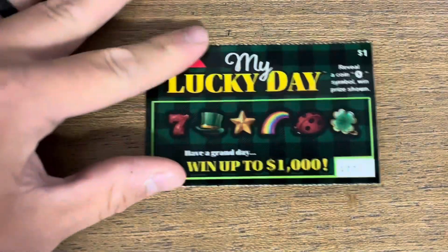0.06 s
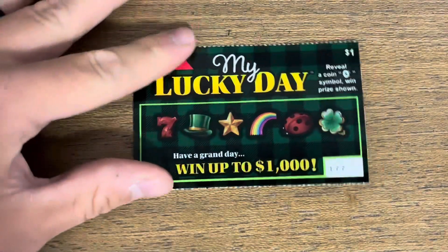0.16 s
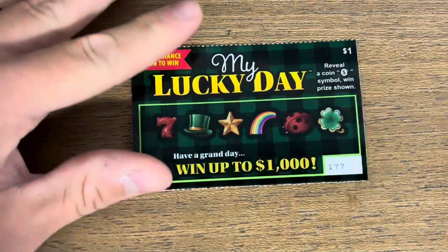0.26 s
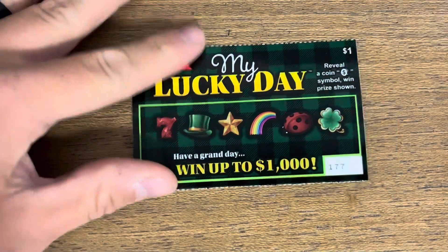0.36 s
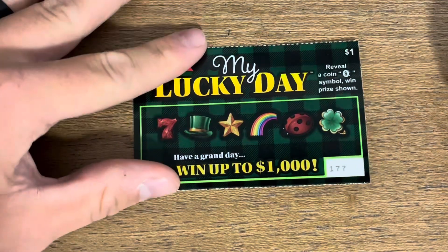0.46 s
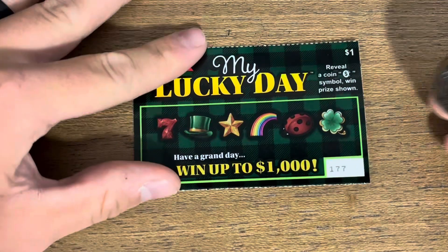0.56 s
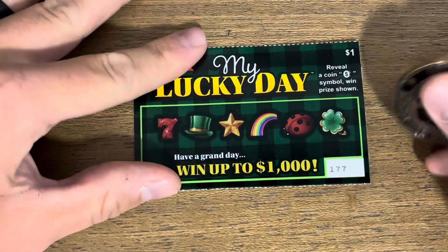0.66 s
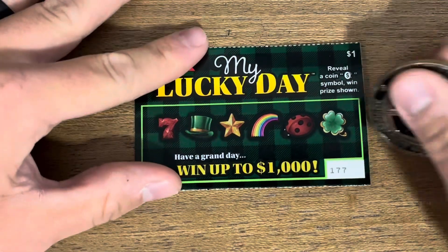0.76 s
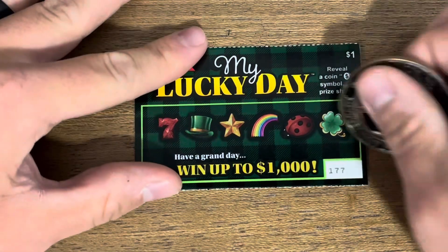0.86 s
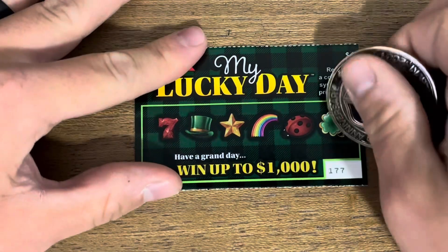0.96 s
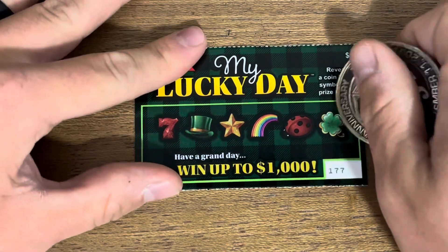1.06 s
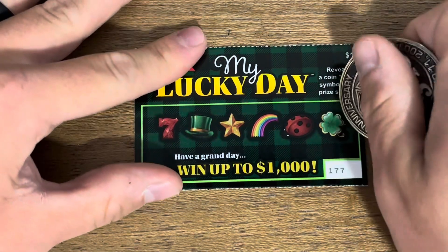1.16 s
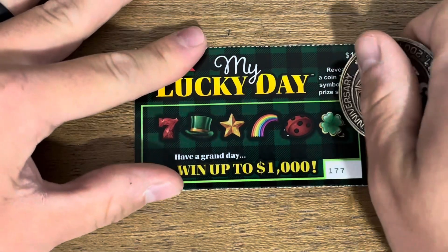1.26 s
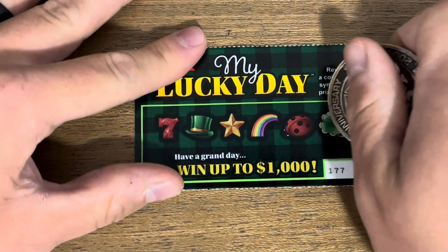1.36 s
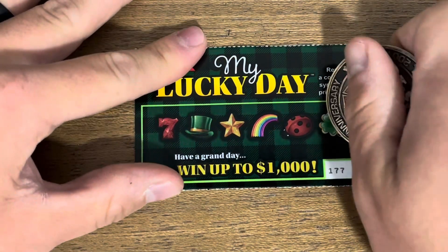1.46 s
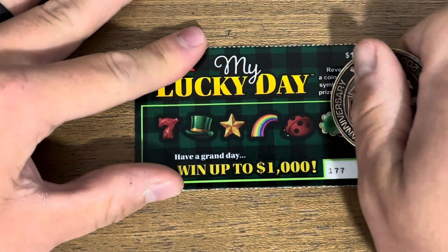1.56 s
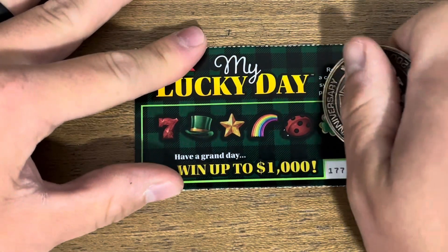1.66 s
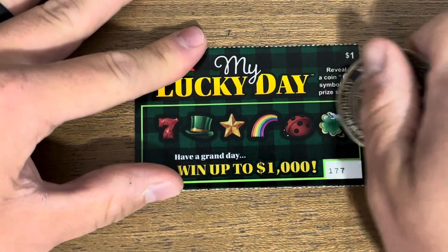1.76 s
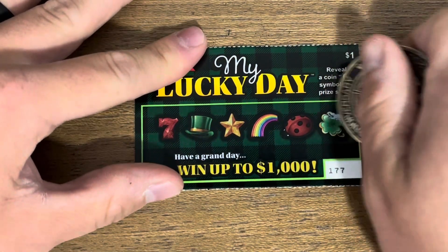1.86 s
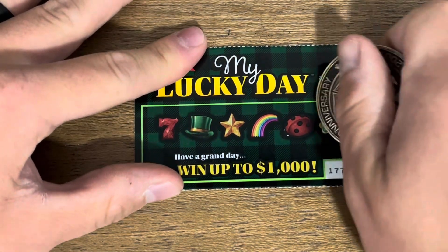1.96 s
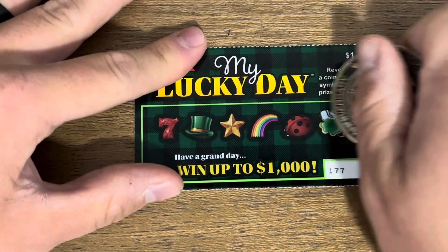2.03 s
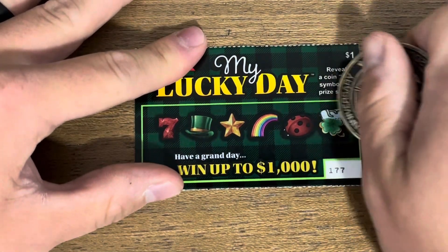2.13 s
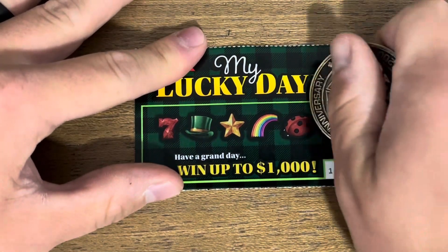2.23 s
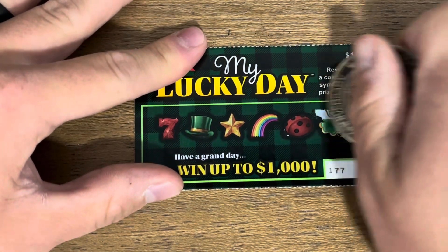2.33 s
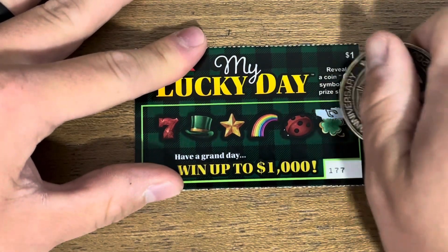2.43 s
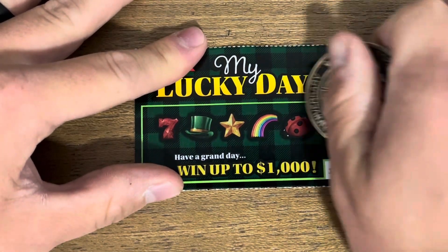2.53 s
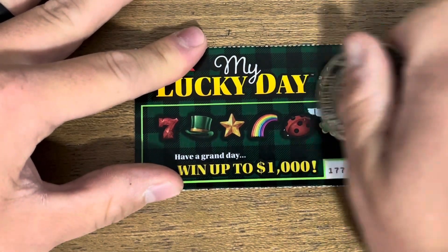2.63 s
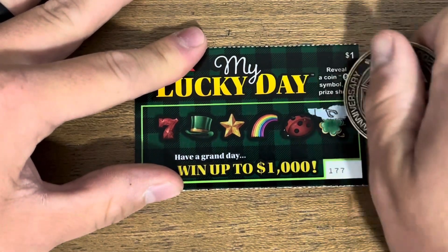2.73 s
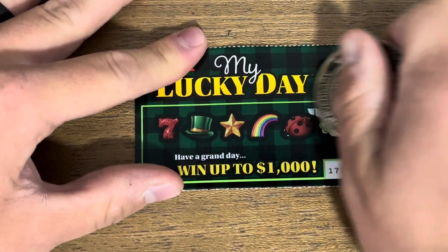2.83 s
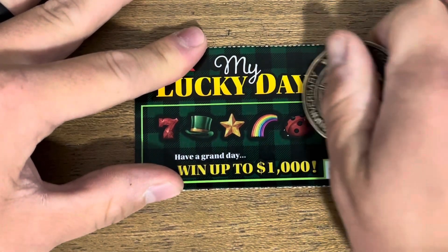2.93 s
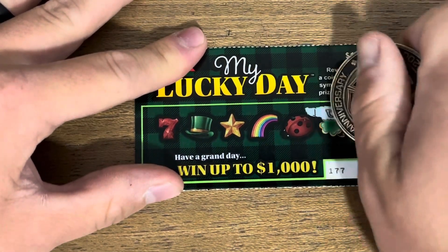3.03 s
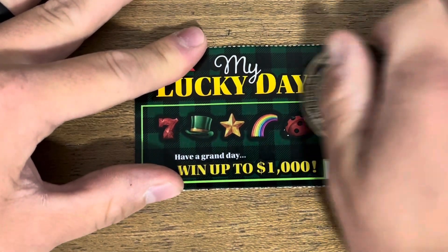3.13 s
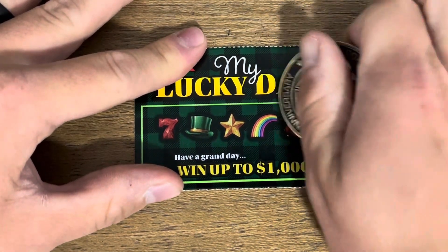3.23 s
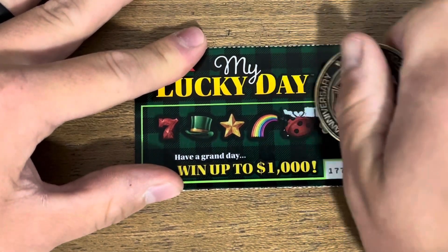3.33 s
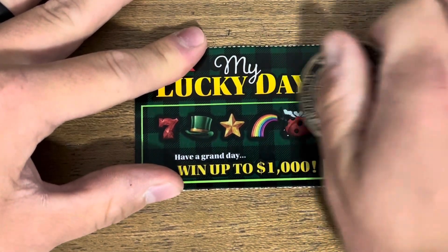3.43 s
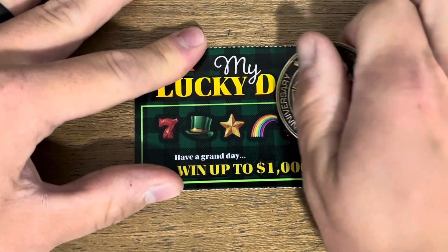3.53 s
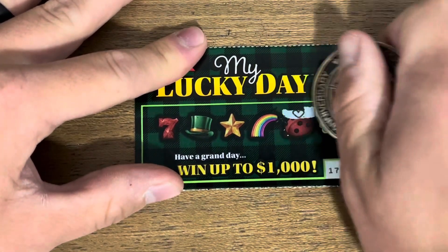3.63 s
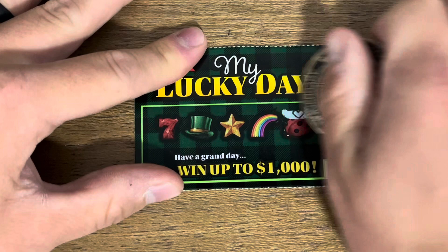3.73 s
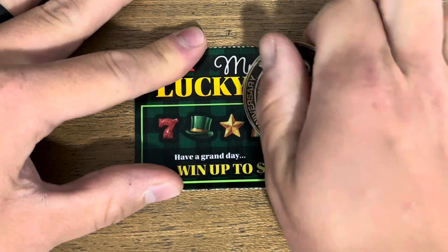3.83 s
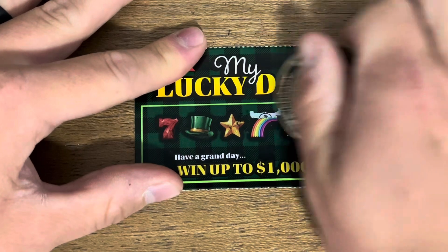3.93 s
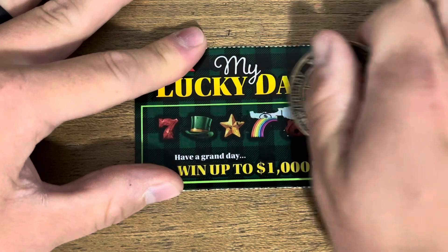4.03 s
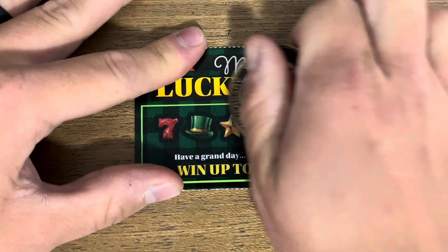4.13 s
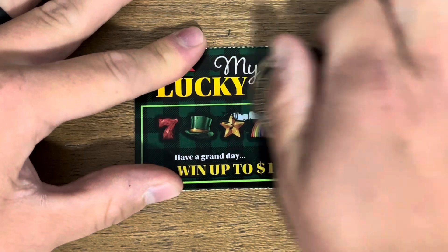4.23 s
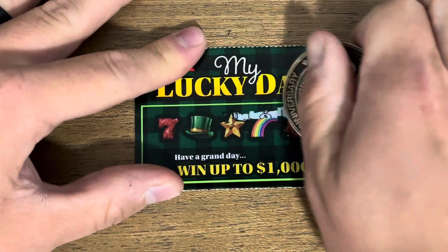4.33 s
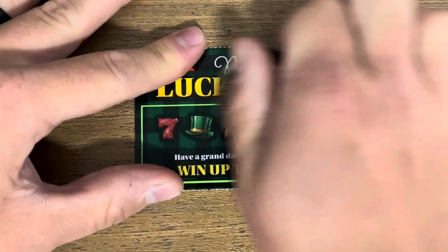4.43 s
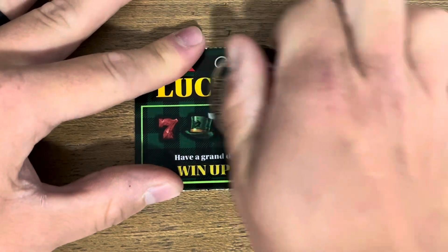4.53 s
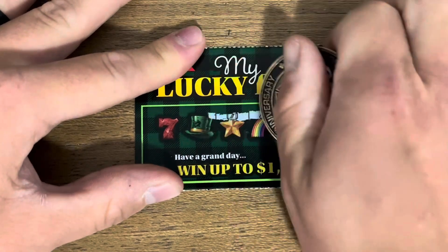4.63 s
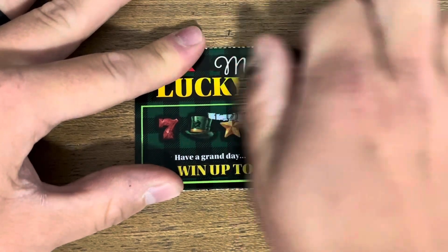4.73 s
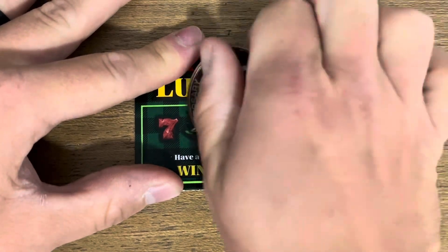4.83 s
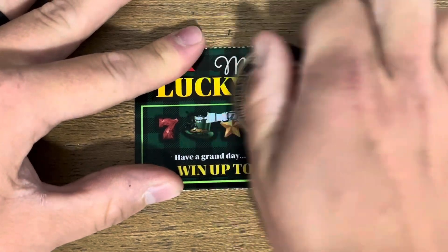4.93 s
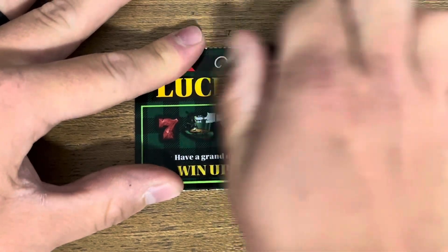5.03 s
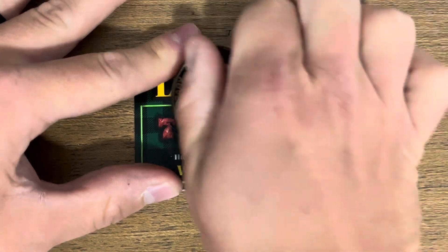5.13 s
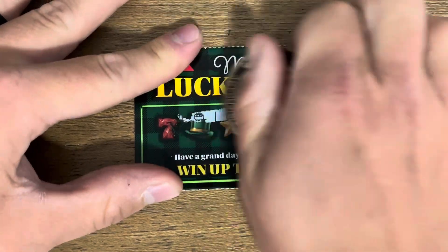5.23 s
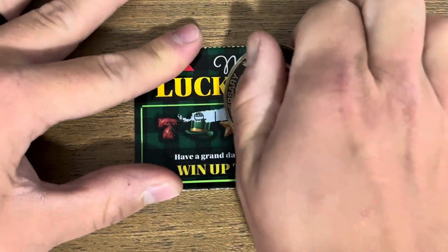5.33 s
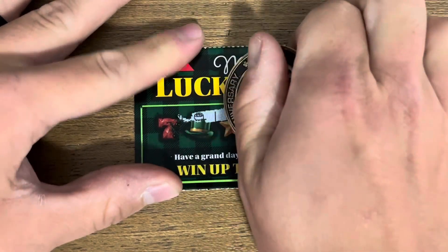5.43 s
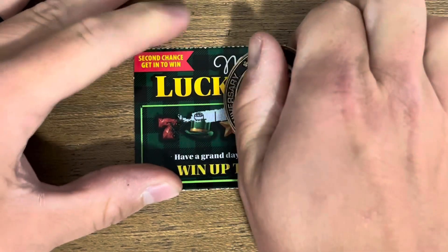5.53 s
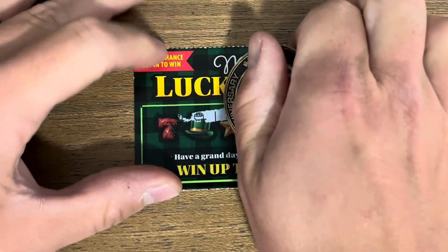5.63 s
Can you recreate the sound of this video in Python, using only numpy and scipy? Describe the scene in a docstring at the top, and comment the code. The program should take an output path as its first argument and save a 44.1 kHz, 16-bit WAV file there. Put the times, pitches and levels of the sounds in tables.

```python
"""A hand shifts a paper ticket with soft drumming and rustling, then lands on a wooden table with a knock.
A coin then scrapes the coating off the ticket in quick back-and-forth strokes.
Friction is noise that grips and slips; it drives resonances of table, coin and ticket. Touches are sums of
decaying sines. A faint room hush lies below, and a two-port microphone hangs close above the table."""
import sys
import numpy as np
from scipy import signal
from scipy.fft import rfft, irfft, next_fast_len
from scipy.io import wavfile
from scipy.ndimage import uniform_filter1d, map_coordinates

SR = 44100
rng = np.random.default_rng(int(sys.argv[2]) if len(sys.argv) > 2 else 0)


def wav_record(signal):
    """Record a signal, one row per channel, as 16-bit PCM in the file named by sys.argv[1]."""
    frames = np.transpose(np.atleast_2d(signal))
    bounded = np.clip(frames, -1, 1)
    # unit amplitude maps onto the largest positive 16-bit level
    quanta = np.round(bounded * 32767).astype(np.int16)
    wavfile.write(sys.argv[1], SR, quanta)


N = 250488  # samples

# Spectrum of the room's hush: f/Hz, level/dB
ROOM_SPECTRUM = [(25, -14), (90, 0), (220, -8), (500, -17), (1000, -21), (1800, -21), (2900, -27),
                 (7000, -35), (14000, -37), (15600, -42)]
# Faint hiss near 5 kHz that comes and goes: t/s, level/dB
BAND_LEVEL = [(0, -86), (1.0, -80), (1.4, -92), (2.3, -80), (2.5, -70), (3.05, -69), (3.3, -79),
              (5.06, -76), (5.25, -92), (5.45, -88), (5.6, -77), (5.68, -76)]
# The pushing arm's shaking of the lowest table mode: t/s, level/dB
ARM_LEVEL = [(0.0, -59), (0.08, -72), (0.2, -63), (0.95, -71), (1.2, -60), (1.52, -74), (1.6, -59),
             (2.15, -60), (2.2, -49), (2.31, -68), (2.48, -59), (2.67, -68), (2.89, -50), (3.08, -65),
             (3.13, -52), (3.24, -74), (3.32, -59), (3.57, -54), (3.61, -67), (3.76, -55), (4.75, -61),
             (4.79, -46), (5.0, -62), (5.11, -46), (5.21, -57), (5.68, -67)]
# Fingers dragging the ticket: t/s, drumming level/dB, rub level/dB, rise per 10 dB/s, fall per 10 dB/s
# (the rub changes 1.3 times as many dB)
DRAGS = [(0.02, -57, -76, .03, .03), (.24, -60, -82, .06, .1), (.345, -58, -65, .04, .03),
         (.39, -49, -80, .04, .02), (.56, -59, -80, .1, .08), (.725, -49, -62, .04, .06),
         (.93, -48, -59, .02, .06), (.992, -50, -55, .01, .1), (1.23, -60, -80, .04, .03),
         (1.42, -64, -68, .1, .035), (5.3, -58, -59, .02, .055), (5.465, -54, -70, .03, .06),
         (5.595, -62, -70, .07, .05)]
# Skin rustling on paper as the hands settle and lift: t/s, level/dB
SKIN_LEVEL = [(0, -71), (.262, -75), (.346, -67), (.43, -73), (.62, -68), (.86, -69), (.99, -76),
              (1.2, -92), (5.415, -92), (5.425, -72), (5.54, -81), (5.59, -69), (5.68, -76)]
# Spectrum of skin on paper: f/Hz, level/dB
RUSTLE_SPECTRUM = [(1000, -12), (1700, 3), (2300, 1), (3300, 2), (5200, 0), (7000, -2), (9500, -5),
                   (13500, -3), (14500, -8), (15600, -13)]
# Knuckle, coin or ticket touching the table: t/s, relative level/dB, hardness/(dB per octave), ring length factor
KNOCKS = [(.717, -36, 0, .5), (.883, -17.5, 2.5, 1), (.8945, -30, -6, 1.3), (.99, -40, -.8, .8),
          (1.856, -37, -4.0, .8), (2.169, -36, -4.0, .8), (2.525, -37, -4.5, .9), (2.677, -32, -4.5, .9),
          (2.862, -37, -4.0, .8), (4.05, -35, -5, 1), (4.4, -32, -5, 1.1), (5.421, -37, 8.0, .4),
          (5.431, -39, -6.0, 1.5)]
# Table modes rung by a touch: f/Hz, level/dB, t60/s before the ring length factor
TABLE_MODES = [(138, -3.5, .13), (232.5, -2, .1), (349, -3, .1), (510, -14, 0.089), (602, -15, .07),
               (750, -3.5, .06), (850, -13, .04), (1007, -13, .03), (1250, -20, .02), (1500, -22, .025),
               (2000, -32, .02)]
# Dry ticks of nail or coin rim on the paper: t/s, relative level/dB, sine f/Hz
TICKS = [(.352, -55, 3000), (.72, -55, 5000), (.794, -50, 4000), (1.713, -46, 12000), (1.887, -43, 4000),
         (1.974, -47, 12000), (2.5845, -43, 12000), (3.2465, -45, 12500), (3.717, -42, 6500),
         (3.9025, -47, 13000), (4.175, -50, 12500), (5.1352, -47, 13000), (5.42, -38, 12000),
         (5.4225, -43, 1800)]
# Strokes, away and back in turn: t at full speed/s, hold/s, rise per 10 dB/s, fall per 10 dB/s,
# first level/dB, last level/dB, bite/dB (rise and fall before each layer's steepness)
STROKES = [(1.305, .04, .022, .025, -48, -56, -7), (1.506, .02, .012, .03, -45, -47, -2),
           (1.624, .025, .02, .04, -48, -50, -2), (1.712, .035, .012, .024, -37, -36, -2),
           (1.842, .058, .015, .02, -40, -34, 0), (1.987, .025, .022, .035, -38, -36, 0),
           (2.145, .045, .02, .026, -39, -38, 0), (2.27, .08, .022, .025, -43, -42, -1),
           (2.439, .086, .012, .03, -40, -37, 1), (2.585, .085, .015, .026, -38, -38, 0),
           (2.759, .075, .03, .043, -39, -39, 0), (2.911, .07, .014, .025, -43, -44, 1),
           (3.084, .039, .016, .038, -36, -35, 0), (3.224, .055, .012, .04, -37, -36, 0),
           (3.409, .054, .016, .02, -36, -38, 0), (3.558, .022, .032, .031, -37, -36, 0),
           (3.73, .066, .027, .018, -33, -38, 6), (3.88, .037, .036, .028, -34, -33, -1),
           (4.055, .05, .035, .03, -34, -33, 0), (4.175, .075, .02, .03, -39, -38, 1),
           (4.346, .065, .018, .035, -35, -33, 0), (4.54, .03, .042, .048, -32, -39, -1),
           (4.7, .063, .026, .029, -37, -34, 0), (4.838, .08, .01, .027, -34, -39, -1),
           (5.008, .05, .025, .03, -35, -35, 2), (5.142, .07, .013, .045, -35, -44, 2)]
# Coin's place along the ticket: t/s, place (0 = right edge, 1 = left end)
PLACE = [(1.3, 0), (1.9, .1), (2.8, .2), (3.5, .5), (3.75, .75), (4.5, .8), (4.85, 1), (5.2, .95)]
# Colour of a stroke, in three one-row tables. Columns: upper over lower table modes/dB, then over the
# stroke: drumming/dB, edge hiss/dB, coin sheen/dB, top fizz/dB
AT_EDGE_DB = [-7, -3.5, -20.5, -24, -24]  # at the right edge
ALONG_DB = [11.5, -10, 6.5, -4.5, 1]  # added by the left end
AWAY_DB = [-1, 3.5, 2, 3, -2.5]  # added on strokes away from the body
# Gain per dB of bite: edge hiss/dB, sheen/dB, fizz/dB
BITE_GAIN = [.7, 1.9, 1]
# The edge catches in the coating and the table top flares: t/s, level over the stroke/dB
CATCHES = [(1.714, 4), (1.737, 5), (1.905, 3), (1.988, 4), (2.297, 4), (2.67, 5), (2.79, 4), (2.945, 6),
           (3.228, 3), (3.545, 3), (3.912, 3), (4.18, 8), (4.41, 3), (4.845, 3), (4.905, 5)]
# Share of a catch's dB in each layer: lower modes, upper modes, drumming, edge hiss, sheen, fizz [no unit]
FLARE_SHARE = [1, 1, .3, .4, .4, .4]
# Lowest table resonances, for arm shake and drumming: f/Hz, width/Hz, level/dB
LOW_MODES = [(61.3, 19.6, 0), (106.6, 20.7, -1), (138.1, 24.9, 2), (242, 39, -6), (283.6, 37, -6),
             (360, 49.7, -7)]
# Resonances of the top under the coin: f/Hz, width/Hz, level/dB
TOP_MODES = [(395, 50, -6), (516, 60, -8), (610, 50, -11), (744, 55, 1.5), (890, 70, -1), (1018, 110, -1)]
# Upper resonances of the top: f/Hz, width/Hz, level/dB
UPPER_MODES = [(1200, 110, -1), (1390, 100, -1), (1550, 100, -1), (1770, 60, -11), (1870, 70, -12)]
# Resonances of coin and ticket in the hiss: f/Hz, width/Hz, level/dB
EDGE_MODES = [(2220, 70, 0), (2390, 110, -4), (2970, 150, -8), (3400, 120, -6), (4090, 200, -6),
              (4500, 160, -11)]
# High resonances of the coin: f/Hz, width/Hz, level/dB
SHEEN_MODES = [(5650, 300, 0), (6100, 300, 1), (6700, 500, -5), (7300, 500, -8), (8300, 1200, -7)]
# Spectrum of the scrape's broad hiss: f/Hz, level/dB
HISS_SPECTRUM = [(1600, -20), (1900, 0), (3000, -3), (4500, -8), (6500, -12), (9000, -14), (9800, -30)]
# Spectrum of the scrape's highest treble: f/Hz, level/dB
FIZZ_SPECTRUM = [(8500, -26), (9500, -6.5), (11000, -6), (12500, -3), (13500, 4), (14000, -9), (14600, -46)]
# Spectrum of the part common to both channels: f/Hz, level/dB
COMMON_SPECTRUM = [(30, -0.5), (6000, -0.5), (7300, -2), (7900, -13), (8200, -40), (9000, -20),
                   (9400, -1.5), (10000, -2.5), (11000, 2), (13600, -1), (14300, -26), (14800, -49)]
# Spectrum of the part with opposite sign in the two channels: f/Hz, level/dB
OPPOSED_SPECTRUM = [(30, -30), (120, -19.5), (370, -8), (800, -6), (1300, -6), (2000, -9), (3200, -15.5),
                    (4200, -30), (5100, -36), (5400, -7), (8500, -1), (10600, -6), (11300, -33),
                    (12400, -28), (13000, -4.5), (14200, -4), (15600, -8)]
# Power share of the opposed part that is the near source: f/Hz, share [no unit]
NEAR_SHARE = [(100, 0.55), (400, 0.64), (1500, .4), (2500, 0.77), (14000, 0.82)]

STEP = 32  # samples between points of the stroke shapes
SAG_DB = 2  # the middle of a stroke skids a little lighter than its ends
LIGHT_DRUM = .5  # dB of drumming kept per dB that a stroke is lighter than the loudest
CATCH_S = .005  # standard deviation of a catch's bell shape, s
WALLS_T60 = .22  # s
TOP_HZ = 15700  # upper limit of the sound, Hz


def amp(db):
    """Level law: decibels to amplitude gain."""
    return 10 ** (np.asarray(db) / 20)


def unit(x):
    """Normalisation of power: x scaled to rms 1."""
    return x / np.sqrt(np.mean(x ** 2) + 1e-20)


def along(points, hz):
    """Logarithmic pitch axis: interpolates (f/Hz, value) points."""
    f, v = np.transpose(points)
    return np.interp(np.log(hz + 1), np.log(f + 1), v)


def curves(rows):
    """Linear interpolation in time: one value per sample for each column after the time."""
    s, *cols = np.transpose(rows)
    return [np.interp(np.arange(N) / SR, s, c, left=-120, right=-120) for c in cols]


def wobble(rate):
    """Band-limited fluctuation: a smooth random curve with rate knots a second."""
    knots = rng.standard_normal(int(N * rate / SR) + 4)
    return map_coordinates(knots, [np.arange(N) * rate / SR])


def filtered(x, response):
    """Linear filtering: the spectrum of x times a complex response of frequency."""
    m = next_fast_len(N + SR // 2)
    return irfft(rfft(x, m) * response(np.fft.rfftfreq(m, 1 / SR)), m)[..., :N]


def coloured(x, spectrum):
    """Spectral shaping: x weighted by the spectrum, silent beyond its ends, at rms 1."""
    def response(hz):
        inside = (hz > spectrum[0][0]) * (hz < spectrum[-1][0])
        return amp(along(spectrum, hz)) * inside
    return unit(filtered(x, response))


def resonant(x, modes):
    """Modal superposition: x drives parallel damped resonators of alternating sign."""
    def response(f):
        total = 0
        for k, (centre, width, db) in enumerate(modes):
            damping = 1j * f * width
            total = total + (-1) ** k * amp(db) * damping / (centre * centre - f * f + damping)
        return total
    return filtered(x, response)


def grit(depth_db, rate):
    """Stick-slip friction: two noise rows (near contact, far side of the top) grip and slip together."""
    return unit(rng.standard_normal((2, N)) * amp(depth_db * wobble(rate)))


def patchy(x, depth_db):
    """Shifting contact: random gain patches in time and frequency vary the colour of x."""
    z = signal.stft(x, nperseg=512)[2]
    field = uniform_filter1d(rng.standard_normal(z.shape[1:]), size=2, axis=0)
    field = uniform_filter1d(field, size=10, axis=1)
    return unit(signal.istft(z * amp(depth_db * unit(field)), nperseg=512)[1][:, :N])


def room():
    """Stationary noise: the steady hush of the room, plus a faint resonant band of varying level."""
    hush = amp(-69.5) * coloured(rng.standard_normal((2, N)), ROOM_SPECTRUM)
    narrow = resonant(rng.standard_normal((2, N)), [(5080, 350, 0)])
    narrow = unit(resonant(narrow, [(5080, 500, 0)]))
    return hush + amp(curves(BAND_LEVEL)[0]) * narrow


def walls(x):
    """Diffuse reverberation: x convolved with exponentially decaying noise after an 8 ms gap."""
    t = np.arange(SR // 2) / SR
    tail = rng.standard_normal((2, len(t))) * amp(-60 * t / WALLS_T60) * (t > .008)
    return signal.fftconvolve(x, tail / np.linalg.norm(tail[0]), axes=1)[:, :N]


def hands():
    """Forced vibration: the pushing arm shakes the lowest table mode."""
    shake = resonant(grit(depth_db=0.5, rate=8), LOW_MODES[:1])
    return amp(curves(ARM_LEVEL)[0]) * unit(resonant(shake, [(58, 60, 0)]))


def fingers():
    """Light friction: skin drags over the ticket swell and fade, drumming and rubbing the top; skin rustles."""
    s, drum_db, rub_db, rise, fall = np.transpose(DRAGS)[:, :, None]
    t = np.arange(N)[None] / SR - s
    edge_db = 10 * np.maximum(-t, 0) / rise + 10 * np.maximum(t, 0) / fall
    drum = unit(resonant(grit(depth_db=2.5, rate=40), LOW_MODES[1:]))
    drum = amp(drum_db - edge_db).sum(0) * drum
    rub = unit(resonant(grit(depth_db=2.2, rate=80), TOP_MODES + UPPER_MODES[:1]))
    rub = amp(rub_db - 1.3 * edge_db).sum(0) * rub
    rustle = coloured(patchy(grit(depth_db=1.5, rate=60), depth_db=2.5), RUSTLE_SPECTRUM)
    return drum + rub + amp(curves(SKIN_LEVEL)[0]) * rustle


def knocks():
    """Impact excitation: touches ring the table modes, hard ones favouring high modes; ticks decay at once."""
    out, t = np.zeros(N + SR), np.arange(SR // 2) / SR
    for s, db, hard_db, stretch in KNOCKS:
        ring = 0
        for hz, level, t60 in TABLE_MODES:
            # each touch excites the modes at new strengths
            mode_db = level + hard_db * np.log2(hz / 400) + rng.normal(0, 1.1)
            ring = ring + amp(mode_db - 60 * t / (t60 * stretch)) * np.sin(2 * np.pi * hz * t)
        onset = 1 - np.exp(-t / .0012)
        out[round(s * SR):][:len(t)] += amp(db - 7) * ring * onset
    for s, db, hz in TICKS:
        snap = np.sin(2 * np.pi * hz * t) + 1.5 * rng.standard_normal(len(t))
        snap = amp(-60 * t / .005) * snap
        out[round(s * SR):][:len(t)] += amp(db - 5) * (snap - .4 * np.roll(snap, 1))  # tilted to treble
    return np.array([out[:N], np.roll(out[:N], 40)])  # around the contact: 40 samples later


def strokes():
    """Speed and pressure: strokes rise, hold and fall in six layers, coloured by place and direction."""
    s, held, rise, fall, first_db, last_db, bite_db = np.transpose(STROKES)[:, :, None]
    clock = np.arange(0, N, STEP) / SR
    t = clock[None] - s
    u = np.clip(t / held, 0, 1)
    hold_db = first_db + (last_db - first_db) * u - SAG_DB * np.sin(np.pi * u)
    edge_db = 10 * np.maximum(-t, 0) / rise + 10 * np.maximum(t - held, 0) / fall
    catch_db = sum(db * np.exp(-((clock - at) / CATCH_S) ** 2 / 2) for at, db in CATCHES)

    place = np.interp(s, *np.transpose(PLACE))
    away = 1 - np.arange(len(s))[:, None] % 2
    colours = zip(AT_EDGE_DB, ALONG_DB, AWAY_DB)
    bright_db, drum_db, *air_db = [a + b * place + c * away for a, b, c in colours]
    lighter_db = first_db.max() - (first_db + last_db) / 2
    drum_db = drum_db + LIGHT_DRUM * (lighter_db - lighter_db.mean())
    lower_db = -10 * np.log10(1 + amp(bright_db) ** 2)  # lower and upper modes share the stroke's power
    air_db = [db + k * bite_db for db, k in zip(air_db, BITE_GAIN)]
    layers_db = [lower_db, lower_db + bright_db, drum_db, *air_db]

    steep = [1.2, 1.15, .55, 1.05, 1.2, 1.55]  # treble needs speed and dies first; the drumming lingers
    gains = []
    for k, db, flare in zip(steep, layers_db, FLARE_SHARE):
        stroke_gain = amp(hold_db + db + flare * catch_db - k * edge_db)
        total = np.sqrt((stroke_gain ** 2).sum(0))  # overlapping strokes add in power
        gains.append(np.interp(np.arange(N), np.arange(0, N, STEP), total))
    return gains


def coin():
    """Friction-driven radiation: the stuttering edge drives the top through the paper and hisses in the air."""
    top, upper, drum, edge, sheen, fizz = strokes()
    stutter = unit(amp(1.6 * wobble(70)))

    def ring(drive, gain, modes):
        """Driven resonance: the gain acts before the modes, so they ring on; scaled by the ungated ring."""
        return resonant(drive * gain, modes) / np.std(resonant(drive, modes))

    drive = grit(depth_db=2.1, rate=260) * stutter
    wood = amp(.8) * ring(drive, top, TOP_MODES) + amp(.6) * ring(drive, upper, UPPER_MODES)
    braking = np.roll(drum, round(.015 * SR))  # the table jolts most as the coin brakes
    jolt = amp(-1.2) * ring(grit(depth_db=2.5, rate=60), braking, LOW_MODES[1:])

    flakes = patchy(grit(depth_db=2.5, rate=400), depth_db=4.0)
    air = edge * amp(-2.5) * unit(resonant(flakes, EDGE_MODES))
    air += sheen * coloured(resonant(flakes, SHEEN_MODES), [(4000, 0), (10000, 0), (12000, -20)])
    air += fizz * coloured(flakes, FIZZ_SPECTRUM)
    broad = patchy(grit(depth_db=2.2, rate=400), depth_db=3.5)
    air += edge * amp(-3) * coloured(broad, HISS_SPECTRUM)
    return wood + jolt + stutter ** 0.61 * air


def scene():
    """Superposition: row 0 is the sound of the near contact, row 1 the sound from around it."""
    table = coin() + knocks()
    return table + amp(-15) * walls(table) + hands() + fingers() + room()


def record(dry):
    """Stereo image: common and opposed parts with set spectra; the near opposed part is a quarter cycle off."""
    near, around = dry

    def share(hz):
        """Partition of power: the near source's part of the opposed sound."""
        return np.clip(along(NEAR_SHARE, hz), 0, 1)

    mid = filtered(near, lambda hz: amp(along(COMMON_SPECTRUM, hz)))
    side = filtered(near, lambda hz: 1j * np.sqrt(share(hz)) * amp(along(OPPOSED_SPECTRUM, hz)))
    side = side + filtered(around, lambda hz: np.sqrt(1 - share(hz)) * amp(along(OPPOSED_SPECTRUM, hz)))
    # the near sound is louder on the left around 600 Hz
    lean = filtered(near, lambda hz: 0.14 * np.exp(-np.log((hz + 1) / 600) ** 2 / 0.4))
    channels = np.array([mid + side + lean, mid - side - lean])
    return filtered(channels, lambda hz: hz < TOP_HZ)


dry = scene()
out = record(dry)
wav_record(out)
```